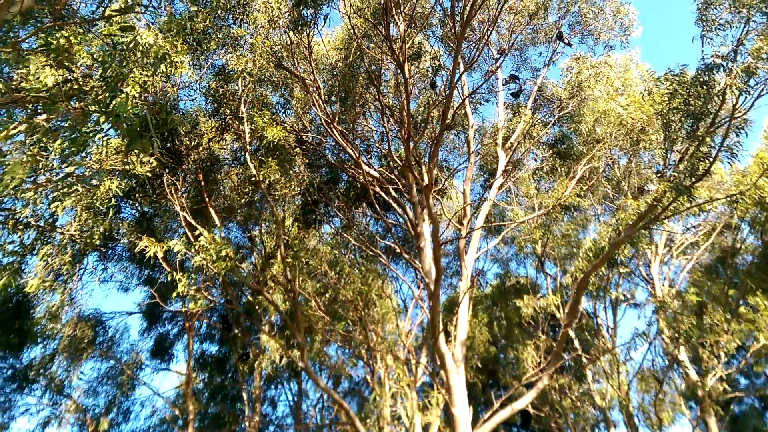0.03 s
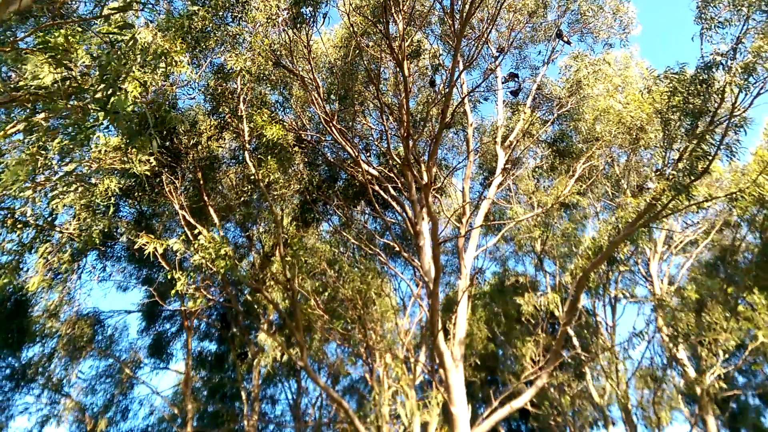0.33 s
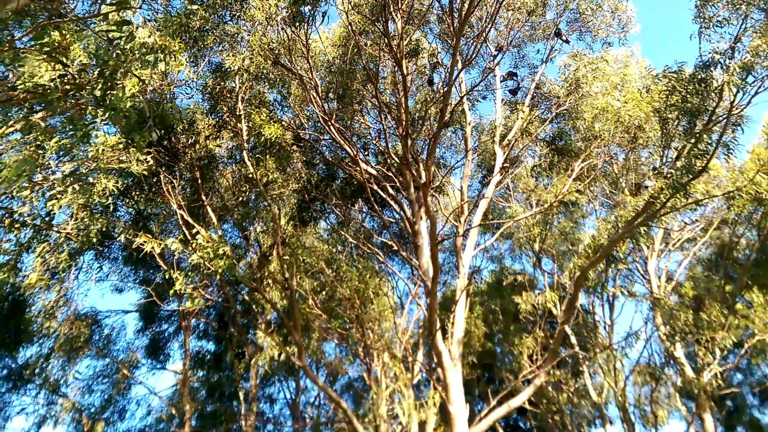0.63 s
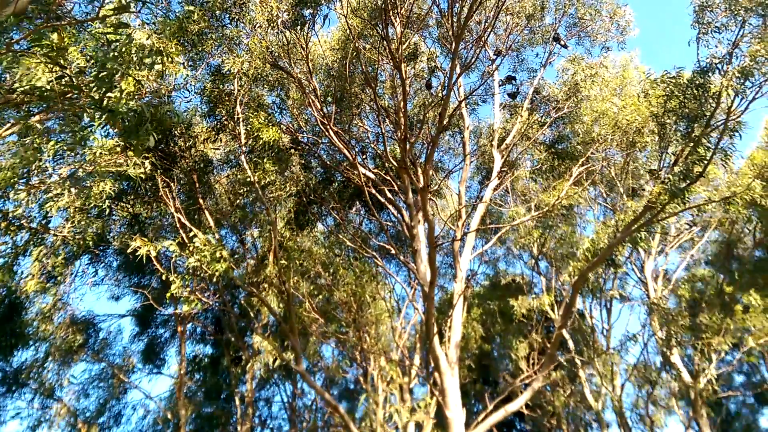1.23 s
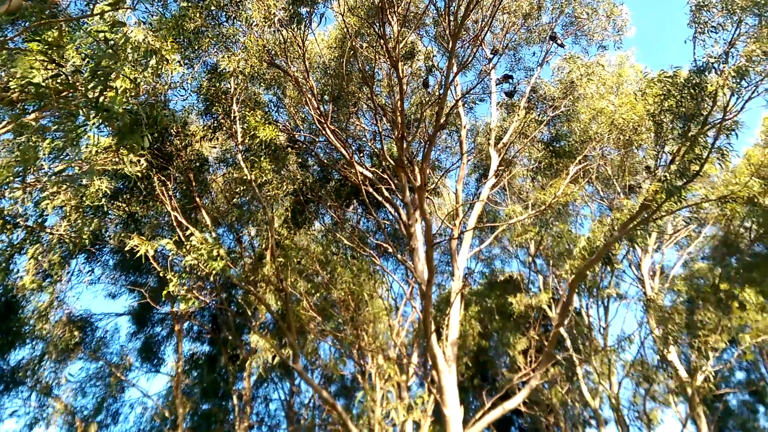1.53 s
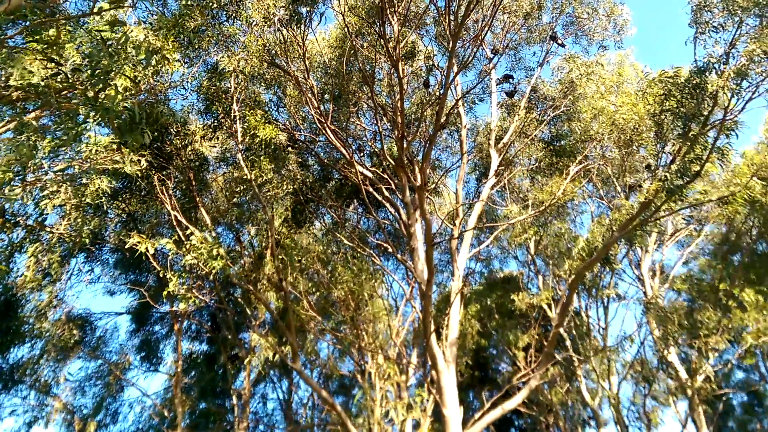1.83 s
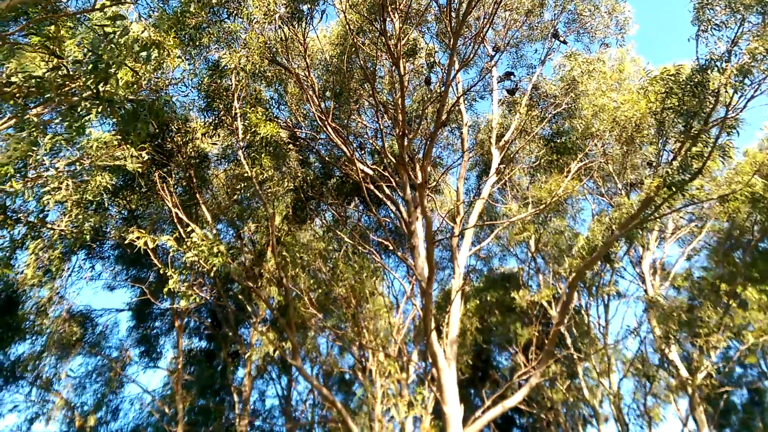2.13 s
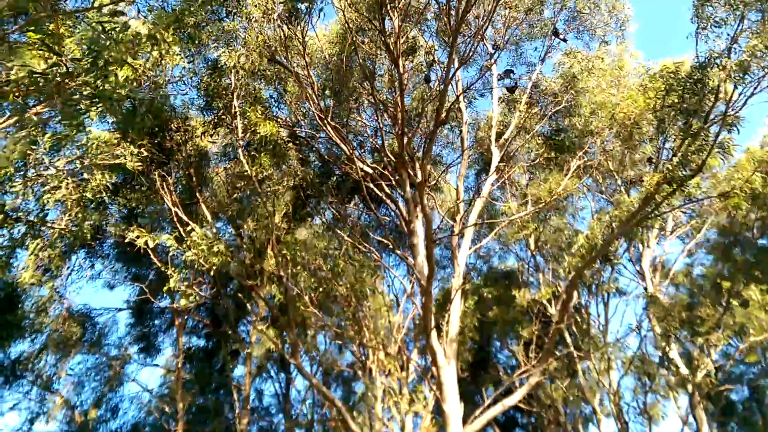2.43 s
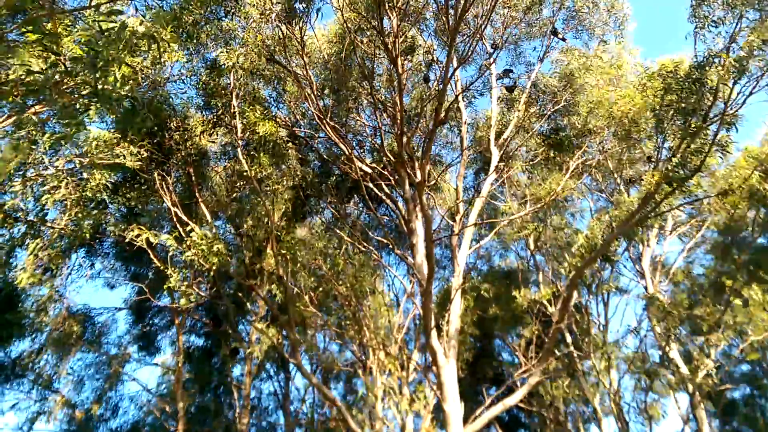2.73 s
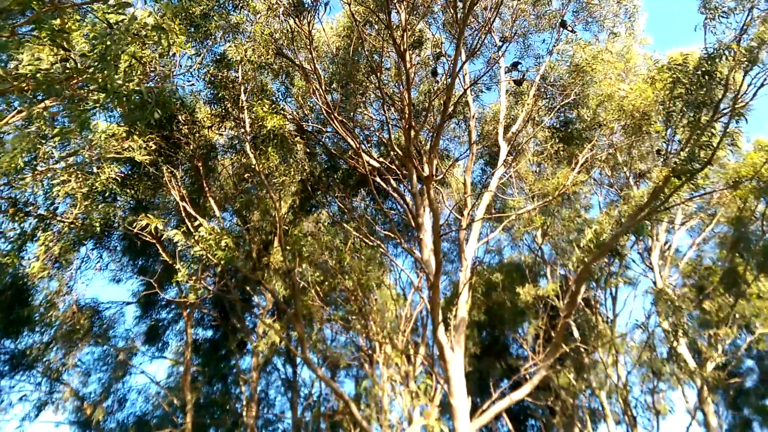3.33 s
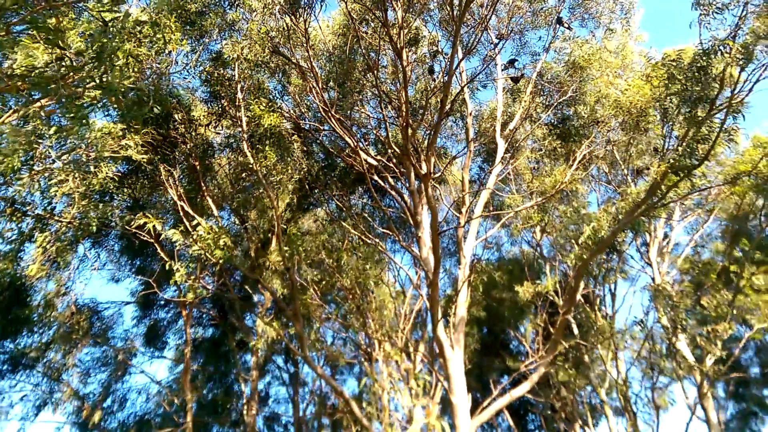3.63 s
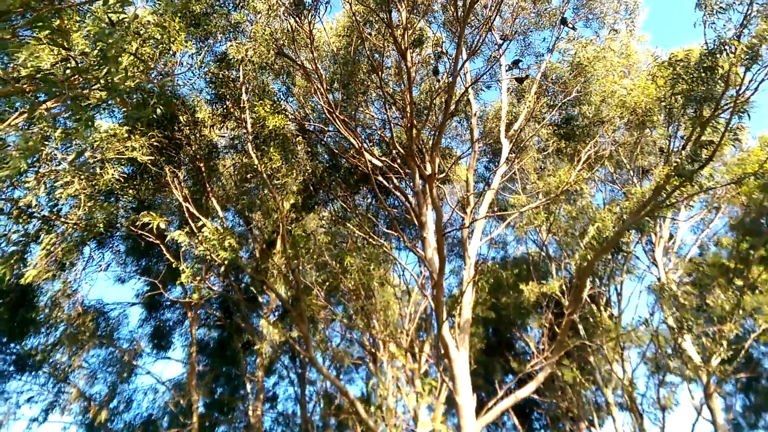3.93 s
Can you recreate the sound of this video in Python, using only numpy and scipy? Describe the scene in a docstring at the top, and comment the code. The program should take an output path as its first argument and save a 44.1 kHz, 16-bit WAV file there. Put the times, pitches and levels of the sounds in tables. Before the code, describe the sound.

A bird whistles among trees while low, fluttering wind buffets the microphone throughout, mostly on the right. Faint chirps and short slurred calls dot the first two seconds. From about 2.3 to 3.4 seconds comes a clear whistle that slides up and back down, echoing slightly. A shorter, louder rising whistle follows at 3.6 seconds. A soft hiss of leaves gradually swells over a dull distant rumble.

```python
"""Among tall gum trees, a currawong gives two long sliding whistles that echo off the trunks.
Its throat singles out the second harmonic, so each is almost a pure tone. Other birds add short slurs
and far chirps. Leaves hiss ever louder over a distant murmur, and the eddies of a breeze buffet the
microphone as pulses of pressure, mostly at its right port."""
import sys
import numpy as np
from scipy import signal
from scipy.fft import rfft, irfft, next_fast_len
from scipy.io import wavfile
from scipy.ndimage import uniform_filter1d, map_coordinates

SR = 44100
rng = np.random.default_rng(int(sys.argv[2]) if len(sys.argv) > 2 else 0)


def unload_audio(sound):
    """Save the sound as a 16-bit wav file, at the path given as the first command line argument."""
    columns = np.transpose(np.atleast_2d(sound))
    # keep every value between -1 and 1, then stretch to whole-number steps
    steps = np.round(np.clip(columns, -1, 1) * 32767)
    wavfile.write(sys.argv[1], SR, steps.astype(np.int16))


N = 176400
TIME = np.arange(N) / SR


def currawong():
    """Frequency modulation shapes two calls: a long arch of pitch, then a short rise."""
    # Each row: time in seconds, fundamental in Hz, level of the second harmonic in dB,
    # its left-over-right balance in dB, level of the fundamental in dB.
    arch = [(2.255, 945, -45, 11, -58), (2.285, 979.7, -37, 8, -53), (2.35, 978.7, -36.5, 6, -60),
            (2.43, 989.5, -37.5, 8, -53), (2.495, 1007, -29.5, 0, -63), (2.62, 1018, -42.5, -1.5, -64),
            (2.73, 1047, -37, 5, -56.5), (2.83, 1068, -46.5, 0, -61), (2.92, 1094, -45, 2, -55.5),
            (3.03, 1140, -60.5, 2, -63), (3.13, 1092, -48.5, 10, -65), (3.175, 1059, -36, 0, -58),
            (3.22, 996, -40.5, 7, -56), (3.31, 954, -34.5, 8, -55), (3.36, 925, -51.5, -6, -64),
            (3.41, 892, -46, -4, -68)]
    rise = [(3.61, 893, -55, 4, -67), (3.645, 909, -48, -7, -52.5), (3.70, 931, -44, -5, -53),
            (3.745, 951, -25, -8, -49), (3.775, 971, -36.5, 1, -56), (3.80, 1004, -27, -1, -71),
            (3.83, 1024, -36.5, 9, -56), (3.866, 1013, -28, 1, -51), (3.882, 1073, -45, 10, -59),
            (3.905, 1120, -50, 6, -60)]
    return whistle(arch), whistle(rise)


def whistle(contour, jitter=0.00258, flutter_db=1.5, edge_s=0.025):
    """Resonance: the throat favours the second harmonic, leaving the first and third faint."""
    hz, second_db, pan_db, first_db = curves(contour)
    hz = uniform_filter1d(hz, size=600) * (1 + jitter * wobble(70))
    start, end = contour[0][0], contour[-1][0]
    gate = np.clip(np.minimum(TIME - start, end - TIME) / edge_s, 0, 1)
    first, second, third = [tone(k * hz) for k in (1, 2, 3)]
    resonant = panned(amp(second_db + flutter_db * wobble(45)) * second, pan_db)
    faint = amp(first_db) * (panned(first, pan_db=-10.5) + amp(-6) * third)
    return gate * (resonant + faint)


def other_birds():
    """Superposition: nearer slurs from either side add to faint, far chirps in the centre."""
    # Each row: start in seconds, length in seconds, first and last pitch in Hz, bow of the glide in Hz,
    # level in dB, relative level of the octave in dB, left-over-right balance in dB.
    slurs = [(0.072, 0.058, 1990, 1663, 40, -53.5, 3.5, 15),
             (0.454, 0.162, 1039, 1096, 64.5, -54, -25, -10), (1.614, .035, 1840, 1720, 0, -62, -25, -4),
             (1.697, .035, 2096, 1950, 0, -58.5, -23, 0), (2.429, .1, 1300, 1750, -64, -58.5, -25, 0),
             (3.049, 0.11, 1506, 850, -37.5, -48, -17, -7), (3.067, .05, 1895, 1540, 14, -51.5, -25, 2),
             (3.177, .07, 1507, 982, 24, -50, -14, -9), (3.872, 0.08, 1870, 1650, 50, -57.5, 5.5, 18)]
    # Each row: start in seconds, length in seconds, first and last pitch in Hz.
    chirps = [(1.093, 0.11, 3240, 3300), (1.19, 0.089, 3100, 2780), (1.39, 0.105, 3000, 2730),
              (1.805, .12, 3150, 3200), (2.058, 0.061, 2800, 2380)]
    near = sum(panned(slur(*row), pan_db) for *row, pan_db in slurs)
    far = sum(slur(*row, bow_hz=30, db=-66, octave_db=-40) for row in chirps)
    return near + far


def slur(start, length, start_hz, end_hz, bow_hz, db, octave_db, jitter=0.0074):
    """Amplitude and frequency modulation: one parabola swells the note and bows its glide."""
    progress = np.clip((TIME - start) / length, 0, 1)
    arc = 4 * progress * (1 - progress)
    glide_hz = start_hz + (end_hz - start_hz) * progress + bow_hz * arc
    hz = glide_hz * (1 + jitter * wobble(200))
    return amp(db) * arc * (tone(hz) + amp(octave_db) * tone(2 * hz))


def direct_path(x, lead_s):
    """Path difference: sound reaches the left port lead_s before the right (after it, if negative)."""
    return filtered(x, lambda hz: np.exp(1j * np.pi * hz * lead_s * np.array([[1], [-1]])))


def tree_echoes(x, build_s=0.015, spread_s=0.045, tail_db=-12, trunk_db=-12):
    """Reverberation: near trunks give early reflections, and the wood scatters a diffuse tail."""
    # Each row: frequency in Hz, time to decay by 60 dB in seconds.
    decay_times = [(500, 0.32), (2000, 0.58), (6000, 0.46)]
    hz, t, spectra = signal.stft(rng.standard_normal((2, SR)), SR, nperseg=256)
    decay = amp(-60 * t / along(decay_times, hz)[:, None])
    build_up = 1 - np.exp(-t / build_s)
    tail = signal.istft(spectra * decay * build_up, SR, nperseg=256)[1]
    response = amp(tail_db) * tail / np.linalg.norm(tail[0])
    for channel in response:
        delays = (rng.random(size=12) * spread_s * SR).astype(int)
        gains = rng.standard_normal(size=12)
        np.add.at(channel, delays, amp(trunk_db) * gains / np.linalg.norm(gains))
    return signal.fftconvolve(x, response, axes=1)[:, :N]


def wind(port_cut_hz=49):
    """Turbulent pressure rumbles on both ports; eddies and buffets strike mostly the windward right."""
    # Each row: frequency in Hz, relative level of the rumble in dB.
    rumble = [(20, -13), (35, -18), (60, -4.5), (100, 1.5), (140, -2.5), (200, -13), (400, -31.5),
              (1000, -58)]
    # The hardest buffets. Each row: time in seconds, strength in dB, centre frequency in Hz.
    buffets = [(.203, -17, 217), (0.224, -17, 278), (0.277, -15.5, 158), (.618, -16.5, 166),
               (.85, -14.5, 155), (.963, -13.5, 113), (1.359, -17.5, 253), (1.707, -19, 241),
               (1.891, -21, 189), (1.944, -14.5, 275), (1.982, -20, 380), (2.287, -19.5, 380),
               (2.351, -17.5, 146), (2.4, -17.5, 135), (2.824, -14.5, 164), (2.851, -17, 338),
               (2.877, -18, 190), (2.939, -15.5, 300), (3.01, -19, 217), (3.18, -13.5, 190),
               (3.247, -19.5, 370), (3.297, -15.5, 343), (3.485, -13.5, 60), (3.563, -15, 170),
               (3.661, -17, 400), (3.727, -11.5, 294), (3.868, -17, 201)]
    left, right = [unit(noise(rumble) * amp(3.5 * wobble(18))) for _ in range(2)]
    times, db, hz = np.transpose(buffets)
    flutter = eddies() + pressure_pulses(times, amp(db), hz)
    # The windward port sheds the deepest bass.
    flutter = filtered(flutter, lambda f: f * f / np.hypot(f * f, port_cut_hz ** 2))
    return np.array([amp(-43) * left + amp(-28) * flutter, amp(-34) * right + flutter])


def eddies(per_second=240, centre_hz=141, size_spread_db=2.5, gain_db=9.5):
    """Shot noise: many small eddies arrive at random and merge into a flutter that follows the gusts."""
    # Each row: time in seconds, relative strength of the breeze in dB.
    gusts = [(0.0, -58), (0.02, -43.5), (0.29, -36), (0.38, -42.5), (0.83, -38), (1.45, -37.5),
             (1.5, -45.5), (1.71, -33.5), (2.76, -42), (2.88, -32), (3.04, -43), (3.33, -35), (3.39, -42.5),
             (3.71, -34.5), (3.72, -29.5), (3.79, -44), (3.82, -35.5), (4.0, -50.5)]
    strength_db, = curves(gusts)
    count = int(per_second * N / SR)
    times = rng.random(size=4000)[:count] * N / SR
    size_scatter, pitch_scatter = rng.standard_normal(size=(4000, 2))[:count].T
    sizes = amp(size_spread_db * np.clip(size_scatter, -2, 2))
    hz = centre_hz * np.exp(0.32 * pitch_scatter)
    return amp(strength_db + gain_db) * unit(pressure_pulses(times, sizes, hz))


def pressure_pulses(times, sizes, hz, corner_hz=490, steepness=3.03):
    """Each passing eddy is one push and pull of pressure, which the port low-pass filters."""
    samples = (times * SR).astype(int)[:, None] + np.arange(-SR // 40, SR // 40)
    phase = 2 * np.pi * hz[:, None] * (samples / SR - times[:, None])
    pulses = -phase / (1 + phase * phase / 4) ** 3
    pulses /= np.abs(pulses).max(axis=1, keepdims=True)
    inside = (samples >= 0) & (samples < N)
    pressure = np.bincount(samples[inside], (sizes[:, None] * pulses)[inside], N)
    return filtered(pressure, lambda f: 1 / np.sqrt(1 + (f / corner_hz) ** steepness))


def leaves(gain_db=8.5, swing_db=0.55):
    """Incoherent addition: countless leaves make a broadband hiss, which slowly swells."""
    # Each row: time in seconds, relative level in dB.
    swell = [(0, -69.5), (.5, -66.5), (1.4, -64), (2.4, -62), (3.2, -62.5), (3.9, -60)]
    # The hiss on each side. Each row: frequency in Hz, relative level in dB.
    left_spectrum = [(300, 1), (1500, 1.5), (3000, 2.5), (5000, 0), (8000, -3.5), (11000, -6.5),
                     (14000, -20), (16000, -8.5)]
    right_spectrum = [(300, -5.5), (1500, 9), (3000, 2.5), (5000, -5), (8000, -3.5), (11000, -6),
                      (14000, -4.5), (16000, -19)]
    swell_db, = curves(swell)
    envelope = amp(swell_db + gain_db + swing_db * wobble(11))
    return envelope * np.array([noise(left_spectrum), noise(right_spectrum)])


def distant_murmur(level_db=-49):
    """A diffuse field: steady, dull noise from afar, uncorrelated between the ports."""
    # Each row: frequency in Hz, relative level in dB.
    spectrum = [(25, -22), (100, 2.5), (300, 4), (500, 4), (800, -0.5), (1200, -1.5), (1700, -6.5),
                (3000, -11), (5000, -18), (10000, -35)]
    gains = amp(level_db) * panned(1, pan_db=-3.4)[:, None]
    return gains * np.array([noise(spectrum), noise(spectrum)])


def amp(db):
    """Decibels as an amplitude ratio."""
    return 10 ** (np.asarray(db) / 20)


def unit(x):
    """Normalisation to an rms of 1."""
    return x / np.sqrt(np.mean(x ** 2) + 1e-20)


def along(points, hz):
    """Interpolation of (Hz, value) points on a logarithmic frequency axis."""
    knots_hz, values = np.transpose(points)
    return np.interp(np.log(hz + 1), np.log(knots_hz + 1), values)


def curves(rows):
    """Linear interpolation in time: one value per sample for each column after the first."""
    times, *columns = np.transpose(rows)
    return [np.interp(TIME, times, column) for column in columns]


def wobble(rate):
    """Smooth random modulation: a spline through `rate` knots a second."""
    return map_coordinates(rng.standard_normal(4096), [TIME * rate], mode="wrap")


def filtered(x, response):
    """Linear filtering: the spectrum of x times a frequency response."""
    size = next_fast_len(N + SR // 2)
    return irfft(rfft(x, size) * response(np.fft.rfftfreq(size, 1 / SR)), size)[..., :N]


def noise(spectrum):
    """Spectral shaping turns white noise into coloured noise of rms 1."""
    return unit(filtered(rng.standard_normal(N), lambda hz: amp(along(spectrum, hz))))


def panned(x, pan_db):
    """A level difference at constant power: left exceeds right by pan_db."""
    ratio = amp(pan_db)
    return np.array([ratio * x, x]) * np.sqrt(2 / (1 + ratio * ratio))


def tone(hz):
    """A sine of rms 1 whose phase is the integral of its frequency."""
    return np.sqrt(2) * np.sin(2 * np.pi * np.cumsum(hz) / SR)


def scene():
    """Superposition of the birds, their echoes, leaves, distant murmur and wind."""
    arch, rise = currawong()
    others = other_birds()
    direct = direct_path(arch, 0.00014) + direct_path(rise, -0.00012) + direct_path(others, 0.00004)
    return direct + tree_echoes(arch + rise + others) + leaves() + distant_murmur() + wind()


def record(dry, top_hz=15750):
    """Band limiting: nothing above top_hz passes."""
    return filtered(dry, lambda hz: hz < top_hz)


dry = scene()
out = record(dry)
unload_audio(out)
```